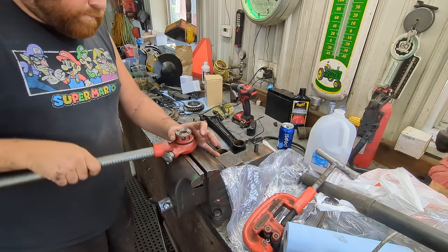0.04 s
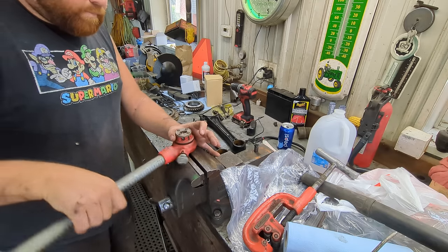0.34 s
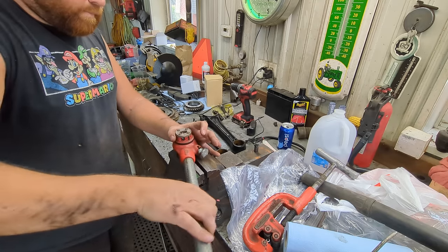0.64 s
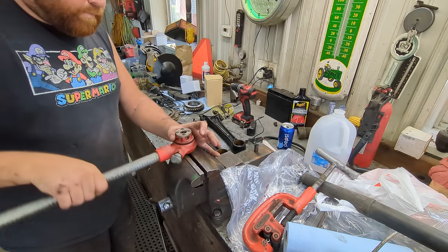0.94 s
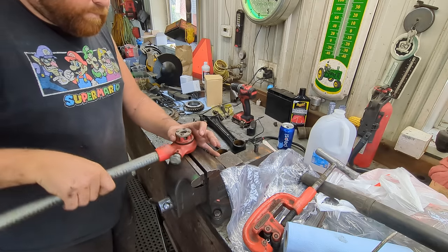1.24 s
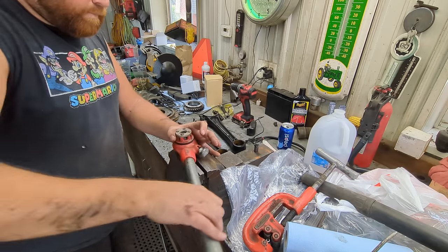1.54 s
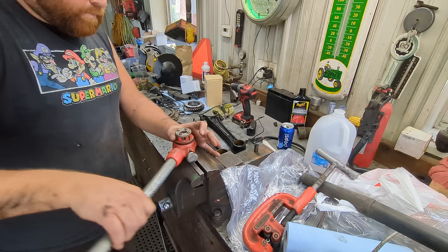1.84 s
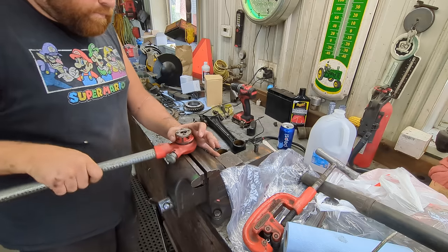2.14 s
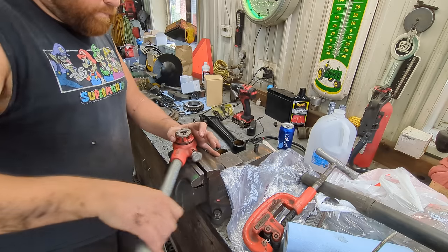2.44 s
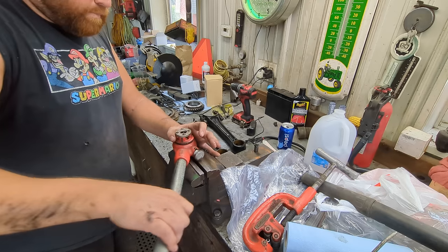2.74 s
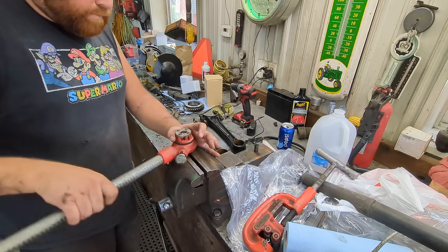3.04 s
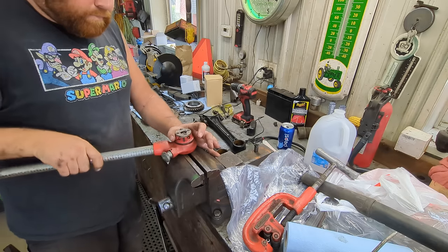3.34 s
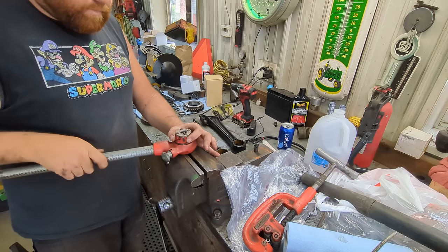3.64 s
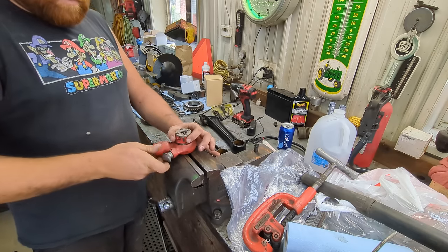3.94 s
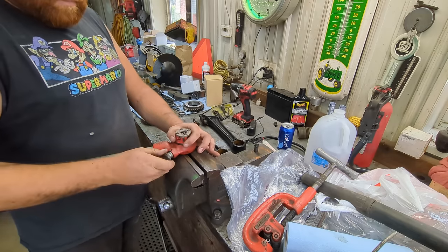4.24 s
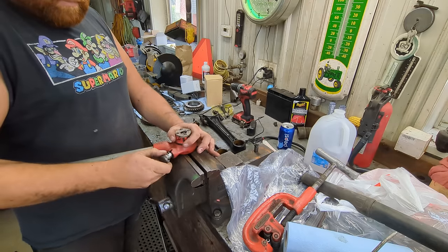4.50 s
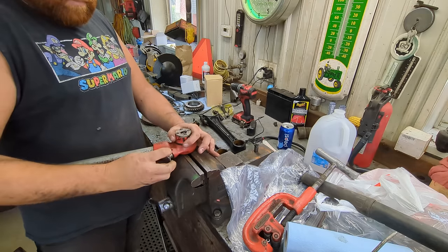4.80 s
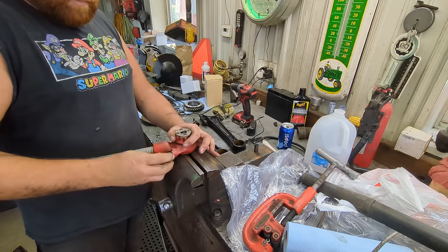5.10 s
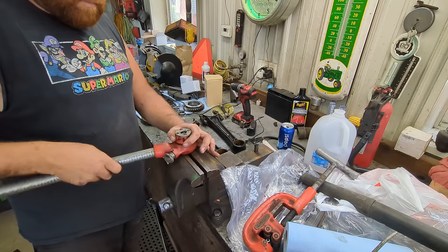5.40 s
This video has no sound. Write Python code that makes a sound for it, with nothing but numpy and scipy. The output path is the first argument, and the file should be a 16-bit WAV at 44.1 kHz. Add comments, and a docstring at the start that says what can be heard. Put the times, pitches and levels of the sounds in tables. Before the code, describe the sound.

A ratcheting pipe threader clicks, rattles and squeaks through three swings, followed by a few quieter knocks and clacks in a workshop.

```python
"""A ratcheting pipe threader, worked by hand on a pipe held in a bench vice.
On three swings of the handle the pawl snaps, steel squeaks and the loose die head clatters and rings.
Each blow passes through the vice and thuds in the bench. After a pause a hand works the pawl knob:
the hollow handle knocks and the pawl gives a few quiet clacks, while a soft hiss comes and goes.
Around it all is a reverberant workshop with a faint bed of still air."""
import sys
import numpy as np
from scipy import signal
from scipy.fft import rfft, irfft, next_fast_len
from scipy.io import wavfile

SR = 44100
rng = np.random.default_rng(int(sys.argv[2]) if len(sys.argv) > 2 else 0)


def materialize(psi):
    """Save the field psi as 16-bit PCM at rate SR to the path in sys.argv[1].

    A 1-D psi becomes a single channel; in a 2-D psi each row is a channel.
    """
    bounded = np.clip(np.atleast_2d(psi).T, -1, 1)
    quanta = np.round(bounded * 32767).astype(np.int16)
    wavfile.write(sys.argv[1], SR, quanta)


N = 245195


def amp(db):
    return 10 ** (np.asarray(db) / 20)


def seconds(length_s):
    return np.arange(int(length_s * SR)) / SR


def curve_at(points, hz):
    """Read a curve drawn in straight lines over log frequency."""
    freqs, values = np.transpose(points)
    return np.interp(np.log(hz + 1), np.log(freqs), values)


def at_level(sound, db):
    """Give a sound the energy of one millisecond at this level."""
    return sound * amp(db) * np.sqrt(SR / 1000 / (np.sum(sound ** 2) + 1e-20))


def place(mix, start_s, sound, db):
    """Drop a hit into the mix at this time and level."""
    part = mix[max(round(start_s * SR), 0):][:len(sound)]
    part += at_level(sound, db)[:len(part)]


def eq_impulse(points, size=4096):
    """The minimum-phase impulse response of an EQ curve."""
    log_gain = np.log(amp(curve_at(points, abs(np.fft.fftfreq(size, 1 / SR)))))
    return np.fft.ifft(np.exp(np.conj(signal.hilbert(log_gain)))).real[:size // 2]


# How alike left and right are in the room: freq_hz, correlation
STEREO_LIKENESS = [(60, 1), (130, 0.94), (290, 0.88), (640, 0.2), (1300, 0), (16000, 0)]

def diffuse(pair):
    """Blend two unrelated signals into a diffuse field: centred in the bass, wide above."""
    left, other = rfft(pair)
    hz = np.fft.rfftfreq(pair.shape[1], 1 / SR)
    likeness = np.clip(curve_at(STEREO_LIKENESS, hz), -1, 1)
    right = likeness * left + np.sqrt(1 - likeness ** 2) * other
    return irfft(np.array([left, right]), pair.shape[1])


def hiss(eq):
    """Diffuse noise of rms 1, coloured by an EQ curve."""
    size = next_fast_len(N)
    gain = amp(curve_at(eq, np.fft.rfftfreq(size, 1 / SR)))
    coloured = irfft(rfft(rng.standard_normal((2, size))) * gain, size)
    noise = diffuse(coloured)[:, :N]
    return noise / noise.std()


# Colour of the room tone: freq_hz, gain_db
AIR_EQ = [(20, -16.5), (45, -11.5), (70, 6.5), (120, -1), (170, -10), (320, -16), (600, -21.5), (1200, -20),
          (2400, -17.5), (4000, -24), (7000, -26.5), (9000, -36), (10000, -39.5), (15000, -43.5)]

def room_tone(level_db=-65):
    """The still air of the shop: a low, steady bed."""
    return amp(level_db) * hiss(AIR_EQ)


# Length of the reverb tail: freq_hz, t60_s
REVERB_DECAY = [(60, 0.7), (250, 0.25), (700, 1), (1500, 1), (3000, 1), (6000, 0.99), (9000, 0.85),
                (14000, 0.81)]
# Colour of the reverb tail: freq_hz, gain_db
REVERB_EQ = [(60, -4), (250, -3), (700, -2.5), (1500, -9), (3000, -9), (6000, -8), (14000, -12.5)]

def workshop_reverb(sound, early_db=-5, predelay_s=.003, early_decay_s=.02, build_s=.008):
    """Quick scatter from the cluttered bench and near wall, then the tail of the room."""
    t = seconds(1.2)
    taps = rng.standard_normal((2, len(t))) * (rng.random((2, len(t))) < 3000 / SR)
    early = diffuse(taps * (t > predelay_s) * np.exp(-t / early_decay_s))
    early *= amp(early_db) / np.linalg.norm(early[0])
    hz, frame_s, bands = signal.stft(diffuse(rng.standard_normal((2, len(t)))), SR, nperseg=256)
    decay_rate = np.log(1000) / curve_at(REVERB_DECAY, hz)[:, None]
    fade = np.exp(-decay_rate * frame_s) * np.sqrt(2 * decay_rate / SR)  # unit energy in each band
    bands *= amp(curve_at(REVERB_EQ, hz))[:, None] * fade
    tail = signal.istft(bands, SR, nperseg=256)[1][:, :len(t)] * (1 - np.exp(-t / build_s))
    return signal.fftconvolve(sound[None], early + tail, axes=1)[:, :N]


# Pan of the tool, band by band: freq_hz, left_over_right_db
TOOL_PAN = [(100, -1.5), (300, -.5), (700, 2), (1300, 1.5), (2400, 3.5), (4400, -7.5), (7000, 3),
            (14000, 0.5)]

def direct_path(sound):
    """The direct sound arrives on the left first, and each band leans to one side."""
    size = next_fast_len(N + 500)
    hz, spectrum = np.fft.rfftfreq(size, 1 / SR), rfft(sound, size)
    lag_s = np.interp(hz, [1400, 2400, 14000], [.0001, .00034, .00031])
    lean = amp(curve_at(TOOL_PAN, hz) / 2)
    right = spectrum / lean * np.exp(-2j * np.pi * hz * lag_s)
    return irfft(np.array([spectrum * lean, right]), size)[:, :N]


# Swells of the soft hiss: middle_s, length_s, level_db
HISS_SWELLS = [(3.997, .42, -67), (4.78, 0.32, -70), (5.2, .3, -73)]
# Colour of the soft hiss: freq_hz, gain_db
SOFT_HISS_EQ = [(150, -14), (330, 7), (700, -13), (1500, -8), (2400, 9), (4000, -8), (6500, -4),
                (8800, -15), (10000, -25), (15000, -32)]

def soft_hiss():
    """A faint, airy hiss, strongest near 2.4 kHz, that swells and fades."""
    t = np.arange(N) / SR
    envelope = sum(amp(db) * np.cos(np.pi * np.clip((t - middle_s) / length_s, -.5, .5))
                   for middle_s, length_s, db in HISS_SWELLS)
    return hiss(SOFT_HISS_EQ) * envelope


def bench_jolts(wobbles, bench_hz=108, heavy_db=-25.5, sag_hz_per_db=4, soft_push_hz=80):
    """Blows pass through the vice into the bench. Returns start_s, boom_db, boards_db, pitch_hz."""
    hard = [(start_s, jolt_db, db + casting_db(treble_db, decay_s) - 2.5)
            for start_s, db, treble_db, decay_s, jolt_db in DIE_CLATTERS]
    hard += [(start_s, jolt_db, jolt_db - 8) for start_s, *_, jolt_db in PAWL_SNAPS]
    hard += [(start_s, db + 8, db + 9) for start_s, db in wobbles]
    # A heavy jolt booms lower; a soft push of the hand rocks the whole bench slowly.
    jolts = [(start_s, db, boards_db, bench_hz - sag_hz_per_db * max(db - heavy_db, 0))
             for start_s, db, boards_db in hard]
    return jolts + [(start_s, jolt_db, db - 7.5, soft_push_hz)
                    for start_s, db, *_, jolt_db in HANDLE_KNOCKS]


# Low rumble of the bench: freq_hz, gain_db
RUMBLE_EQ = [(25, -40), (45, -15.5), (62, 9), (125, 1), (160, -12.5), (300, -35), (700, -72.5)]
# Hollow knock of its boards: freq_hz, gain_db
BOARDS_EQ = [(90, -26.5), (150, -2.5), (205, 3), (245, -6.5), (285, 3.5), (305, 0), (326, 6.5), (360, -6.5),
             (430, -3.5), (560, -19.5), (1500, -60)]

def bench_thuds(jolts, lag_s=.005, boom_swell_s=.0093, boards_swell_s=.012, pitch_spread=.04):
    """The heavy bench answers late and swings up into a boom; its boards knock above it."""
    out, t = np.zeros(N), seconds(.22)
    rumble_eq, boards_eq = eq_impulse(RUMBLE_EQ), eq_impulse(BOARDS_EQ)
    boom_env, boards_env = t * np.exp(-t / boom_swell_s), t * np.exp(-t / boards_swell_s)
    for struck_s, boom_db, boards_db, pitch_hz in jolts:
        start_s = struck_s + lag_s
        hz = pitch_hz * (1 + pitch_spread * rng.standard_normal())
        rumble, knock = rng.standard_normal((2, len(t)))
        place(out, start_s, boom_env * np.sin(2 * np.pi * hz * t), boom_db - 3)
        place(out, start_s, signal.fftconvolve(boom_env * rumble, rumble_eq), boom_db - 5)
        place(out, start_s, signal.fftconvolve(boards_env * knock, boards_eq), boards_db)
    return out


# The hand bumps the handle around the pawl knob:
# start_s, level_db, upper_modes_db, rattle_db, rattle_decay_s, bench_jolt_db
HANDLE_KNOCKS = [(3.99, -72, -8, -50.5, .006, -55), (4.065, -77, -20, -62, .016, -38),
                 (4.163, -57.5, -25, -55.5, .008, -42), (4.334, -53, -26, -47.5, 0.017, -41.5),
                 (4.503, -46.5, 6, -42, .011, -42), (4.534, -38.5, 5.5, -44, 0.017, -45),
                 (4.55, -38, 5, -34.5, 0.013, -33.5), (4.577, -33.5, -14, -53, .016, -33),
                 (4.786, -46, -6, -42.5, 0.039, -38), (4.906, -49.5, 12, -44.5, .007, -42),
                 (4.942, -43.5, 1, -34.5, .012, -50), (4.96, -37, -20, -44, .008, -38.5),
                 (5.06, -68, -5, -59, .016, -41.5), (5.25, -59, -5, -55.5, .014, -41.5),
                 (5.452, -49.5, -12, -55.5, 0.011, -39)]
# Resonances of the hollow handle: pitch_hz, gain_db, t60_s
HANDLE_MODES = [(326, 3, 0.084), (420.1, -10.5, 0.13), (730, -4, .1), (804.6, 2.5, .06), (935, -5.5, .1),
                (1190, -8.5, .11), (1530, -8, .11)]

def handle_knocks(wobbles, swell_s=.0019, scrape=1.6):
    """A dull push and a short scrape ring the steel tube; the wobbling die head makes it hum."""
    out, t = np.zeros(N), seconds(.2)
    bumps = [knock[:3] for knock in HANDLE_KNOCKS]
    hums = [(start_s, db + .5, -25) for start_s, db in wobbles]  # mostly the lowest mode
    for start_s, db, upper_db in bumps + hums:
        tone = np.zeros(len(t))
        for mode, (hz, mode_db, t60_s) in enumerate(HANDLE_MODES):
            push = t * np.exp(-t / swell_s) * (1 + scrape * rng.standard_normal(len(t)))
            envelope = signal.lfilter([1], [1, -np.exp(-np.log(1000) / (t60_s * SR))], push)
            gain = amp(mode_db + upper_db * (mode > 0))
            tone += gain * envelope * np.sin(2 * np.pi * (hz * t + rng.random()))
        place(out, start_s, tone, db)
    return out


# Resonances of the die head and pipe: pitch_hz, gain_db, t60_s
STEEL_MODES = [(460, -9, .4), (556, -7, 0.22), (590, -4.5, .4), (920, -8, .6), (1180, -0.5, .55),
               (1207, -7, .45), (1540, -9.5, .4), (1736, -12, 0.65), (2000, -8.5, 0.9), (2880, -12.5, .7),
               (3025, -7.5, .6), (3070, -12.5, 0.39), (3200, -8.5, 0.65), (5150, -5.5, .7),
               (5720, -7.5, 0.96), (6650, -1, .55), (8807, -10.5, .5)]

def steel_ring(hits, ring_db=-61):
    """The steel rings on after every blow; each mode has its own phase left and right."""
    t = seconds(.99)
    ring = sum(amp(db - 60 * t / t60_s) * np.sin(2 * np.pi * (hz * t + rng.random((2, 1))))
               for hz, db, t60_s in STEEL_MODES)
    return amp(ring_db) * signal.fftconvolve(hits[None], ring, axes=1)[:, :N]


# Short, high squeaks: start_s, level_db, pitch_hz, swell_s
STEEL_SQUEAKS = [(0.334, -41.5, 6960, .0013), (0.503, -30.5, 5310, .009), (.888, -31, 5225, .008),
                 (1.507, -40, 6900, .004), (1.885, -30.5, 7084, .002), (2.535, -31, 6980, .001),
                 (2.699, -20.5, 5716, .002)]

def steel_squeaks(waver_hz=110):
    """Steel sticks and slips on steel for a moment: a narrow, unsteady whistle."""
    out, t = np.zeros(N), seconds(.08)
    for start_s, db, hz, swell_s in STEEL_SQUEAKS:
        waver = signal.lfilter([1], [1, -np.exp(-np.pi * waver_hz / SR)], rng.standard_normal(len(t)))
        cycles = np.cumsum(hz + waver_hz * waver / waver.std()) / SR
        place(out, start_s, t * np.exp(-t / swell_s) * np.sin(2 * np.pi * cycles), db)
    return out


# Swings of the handle: start_s, stop_s, wobble_db
HANDLE_SWINGS = [(0.358, .9, -52), (1.331, 1.9, -52), (2.38, 2.72, -48.5)]

def die_wobbles(rate_hz=22, jitter_s=.008, spread_db=1):
    """During a swing the loose die head rocks unevenly on the pipe. Returns start_s, level_db."""
    even = np.array([(at_s, db) for start_s, stop_s, db in HANDLE_SWINGS
                     for at_s in np.arange(start_s, stop_s, 1 / rate_hz)])
    return even + rng.standard_normal((100, 2))[:len(even)] * [jitter_s, spread_db]


def casting_db(treble_db, decay_s, full_decay_s=.011):
    """Relative level of the body: a dull, long blow moves the casting more than a bright, brief one."""
    brevity_db = 20 * np.log10(min(decay_s / full_decay_s, 1))
    return -1.5 - .3794 * treble_db + brevity_db


def loose_blow(start_s, db, treble_db, decay_s):
    """A blow on the free die head. Returns start_s, level_db, body_db, treble_db, decay_s."""
    return start_s, db, casting_db(treble_db, decay_s), treble_db, decay_s


# The die head clatters on the pipe, mostly as a swing starts and stops:
# start_s, level_db, relative_treble_db, decay_s, bench_jolt_db
DIE_CLATTERS = [(0, -37, -4.5, 0.13, -35.5), (.272, -40.5, -15, 0.022, -37), (.324, -40, -5, 0.0078, -34),
                (0.5, -34, 3.5, 0.017, -50), (0.596, -42, 1.5, 0.0023, -36),
                (.737, -28.5, -7, 0.0087, -19.5), (.8, -38.5, -6, 0.011, -26.5),
                (.852, -29.5, -4.5, 0.024, -28), (.893, -26, -4, .012, -29), (.91, -36.5, -25.5, .018, -28),
                (1.254, -42.5, -16, 0.008, -43), (1.281, -39, -22.5, .004, -33.5),
                (1.393, -44, -18.5, 0.01, -29.5), (1.463, -44.5, -15, 0.016, -42),
                (1.486, -35, -10, .006, -42), (1.533, -27.5, -4.5, 0.0084, -33),
                (1.671, -20.5, -14.5, 0.0088, -29), (1.691, -23, -16.5, 0.0057, -15),
                (1.827, -24.5, -2.5, 0.014, -36), (1.866, -28, -10.5, 0.018, -31.5),
                (2.296, -43, -14.5, 0.0098, -35), (2.321, -40.5, -4, .003, -35),
                (2.351, -41.5, -13, 0.011, -35), (2.409, -44.5, -17.5, 0.017, -38.5),
                (2.531, -31, -8.5, 0.0034, -37.5), (2.6954, -17, 1.5, 0.0039, -28.5),
                (2.8145, -25.5, -11, .009, -30), (2.844, -28, -7, 0.0068, -23.5)]

def die_blows(wobbles, bounce_s=.035, held_body_db=-5.5, held_treble_db=-14.5):
    """Everything that rattles the die head: clatters, pawl snaps, knocks of the hand and wobbles."""
    blows = [loose_blow(*clatter[:4]) for clatter in DIE_CLATTERS]
    for start_s, db, *_ in PAWL_SNAPS:
        # Each snap shakes the head and the pawl bounces once; its spring limits both.
        shake_db, bounce_db = min(db - 12.5, -31.5), min(db - 20.5, -37.5)
        blows.append(loose_blow(start_s, shake_db, treble_db=-23, decay_s=.011))
        blows.append(loose_blow(start_s + bounce_s, bounce_db, treble_db=-6, decay_s=.003))
    blows += [(start_s, rattle_db, held_body_db, held_treble_db, decay_s)
              for start_s, _, _, rattle_db, decay_s, _ in HANDLE_KNOCKS]
    return blows + [loose_blow(start_s, db, treble_db=-13, decay_s=.011) for start_s, db in wobbles]


def chatter(decay_s, attack_s, hits_per_s=2200, spread_db=2, grit=.36):
    """A dying run of tiny impacts of uneven size, with fine scraping between them."""
    t = seconds(.4)
    hits = rng.random(len(t)) < hits_per_s / SR
    sizes = amp(spread_db * np.minimum(rng.exponential(1, len(t)), 3))
    run = hits * sizes * rng.choice([-1, 1], len(t)) + grit * rng.standard_normal(len(t))
    envelope = np.exp(-t / decay_s) * (1 - np.exp(-t / attack_s))
    return (run * envelope)[t < 10 * decay_s]


# Body of the heavy casting: freq_hz, gain_db
BODY_EQ = [(200, -22.5), (380, 3), (440, -4.5), (490, -7), (600, 1.5), (720, -3), (930, 2), (1040, -1),
           (1170, 4), (1320, -7), (1500, 0.5), (2100, -18), (4000, -61.5)]
# Midrange clack of the small hard parts: freq_hz, gain_db
CLACK_EQ = [(900, -33.5), (1500, -4.5), (1850, 5.5), (2400, 3), (3000, -2), (3450, -3.5), (3850, -15.5),
            (4600, -8), (8000, -58)]
# Their bright top end: freq_hz, gain_db
TREBLE_EQ = [(2800, -28), (4000, -4.5), (4700, -2), (5400, 0), (6150, -7), (6900, 1.5), (7600, -2),
             (8900, -5), (9600, -21.5), (11500, -16.5), (12400, -29), (14000, -21.5), (15000, -33)]

def die_rattle(blows, casting_stretch=1.4):
    """Play between die, head and pipe: small hard parts chatter, and the casting settles later."""
    out = np.zeros(N)
    body, clack, treble = map(eq_impulse, (BODY_EQ, CLACK_EQ, TREBLE_EQ))
    for start_s, db, body_db, treble_db, decay_s in blows:
        quick = chatter(decay_s, attack_s=.00099)
        slow = chatter(decay_s * casting_stretch, attack_s=.0055)
        for drive, eq, layer_db in (slow, body, body_db), (quick, clack, 0), (quick, treble, treble_db):
            place(out, start_s, signal.fftconvolve(drive, eq), db + layer_db)
    return out


# Pawl snaps and hard steel contacts: start_s, level_db, pitch_hz, relative_treble_db, bench_jolt_db
PAWL_SNAPS = [(.336, -39.5, 3280, -0.5, -33.5), (0.522, -23.5, 2660, -9, -25.5),
              (0.6734, -29, 2850, -13.5, -22), (0.9006, -27.5, 3130, 1.5, -31),
              (1.5037, -21.5, 2670, -10, -32.5), (1.656, -28.5, 2694, -13, -30.5),
              (1.886, -23, 2634, -2, -19.5), (2.536, -18, 2520, -9, -30.5), (2.576, -33.5, 2700, -0.5, -34),
              (2.699, -10, 2964, -9.5, -20.5), (4.906, -39.5, 2700, -24, -55),
              (4.957, -30.5, 2450, -19, -39.5), (5.555, -44.5, 2570, -9, -55)]

def pawl_snaps(ping_swell_s=.00036, tick_swell_s=.00056, body_db=-17.5, clack_db=-9):
    """Each snap is a few cycles of heavily damped steel tone, with a bright tick and a little body."""
    out, t = np.zeros(N), seconds(.03)
    body, clack, treble = map(eq_impulse, (BODY_EQ, CLACK_EQ, TREBLE_EQ))
    for start_s, db, hz, treble_db, _ in PAWL_SNAPS:
        ping = t * np.exp(-t / ping_swell_s) * np.sin(2 * np.pi * hz * t)
        place(out, start_s, ping, db)
        tick = t * np.exp(-t / tick_swell_s) * rng.standard_normal(len(t))
        for eq, layer_db in (body, body_db), (clack, clack_db), (treble, treble_db):
            place(out, start_s, signal.fftconvolve(tick, eq), db + layer_db)
    return out


def scene():
    """Threader and bench, heard directly and through the workshop, over the room tone."""
    wobbles = die_wobbles()
    steel = pawl_snaps() + steel_squeaks() + die_rattle(die_blows(wobbles))
    work = steel + bench_thuds(bench_jolts(wobbles)) + handle_knocks(wobbles)
    return direct_path(work) + steel_ring(steel) + workshop_reverb(work) + soft_hiss() + room_tone()


def record(dry, low_cut_hz=46, high_cut_hz=15500):
    """Roll off the deepest bass and cut the very top."""
    low_cut = signal.butter(4, low_cut_hz, "highpass", fs=SR, output="sos")
    high_cut = signal.firwin(511, high_cut_hz, window=("kaiser", 9), fs=SR)
    return signal.oaconvolve(signal.sosfilt(low_cut, dry), high_cut[None], "same")


dry = scene()
out = record(dry)
materialize(out)
```